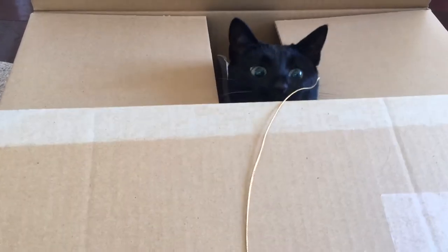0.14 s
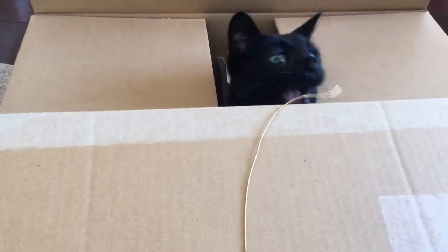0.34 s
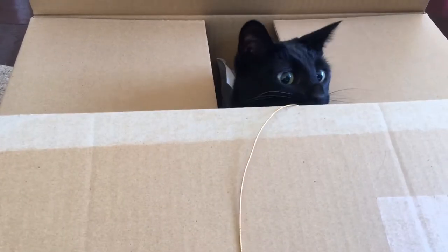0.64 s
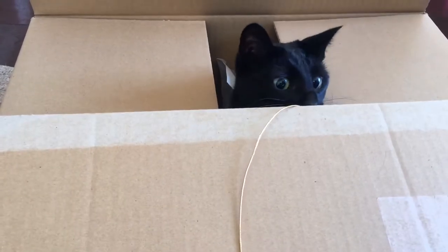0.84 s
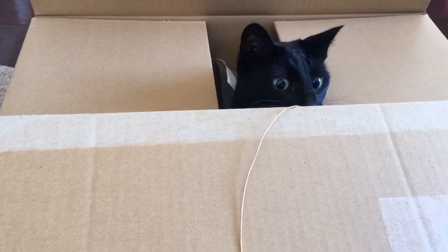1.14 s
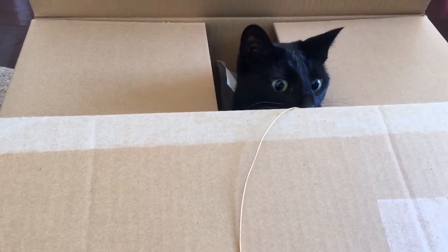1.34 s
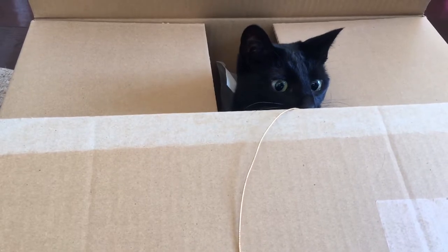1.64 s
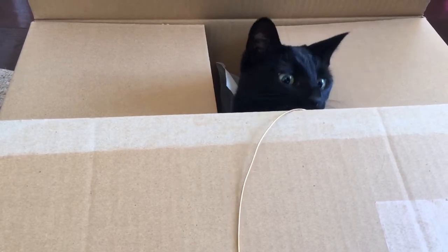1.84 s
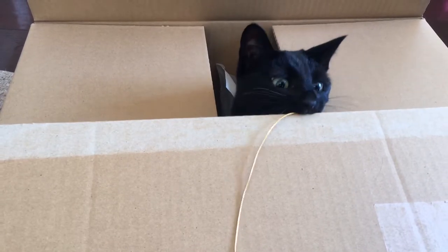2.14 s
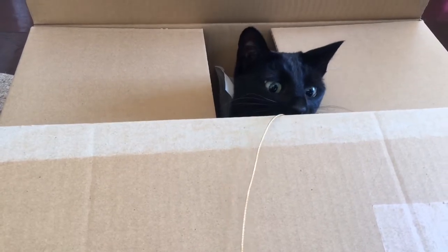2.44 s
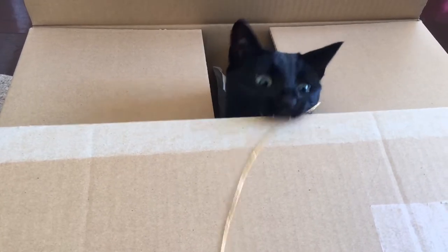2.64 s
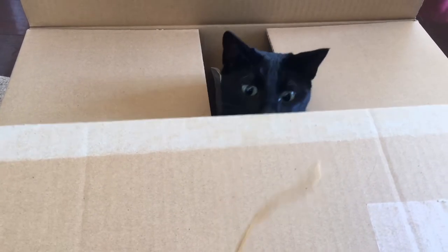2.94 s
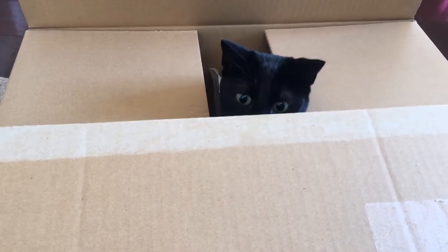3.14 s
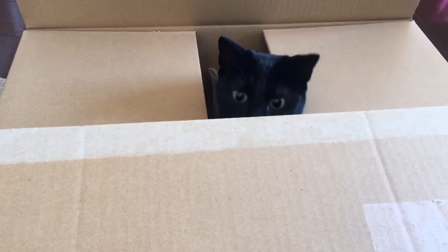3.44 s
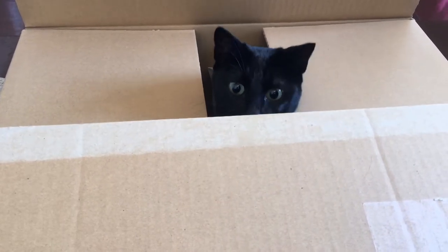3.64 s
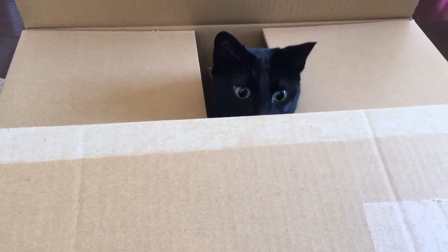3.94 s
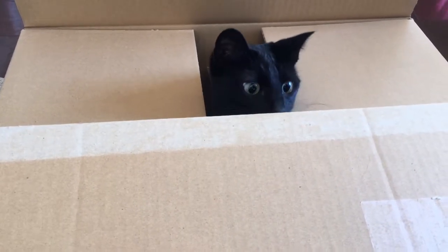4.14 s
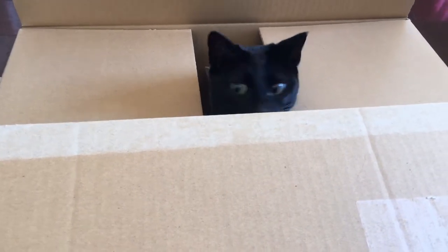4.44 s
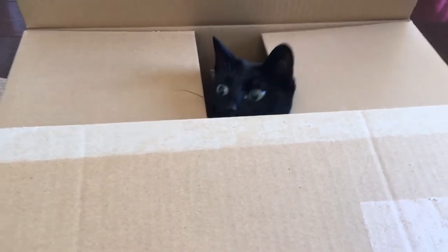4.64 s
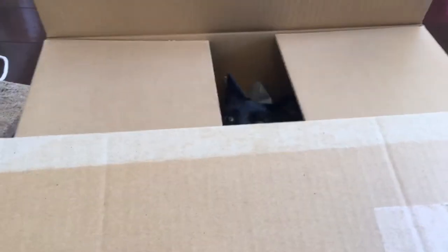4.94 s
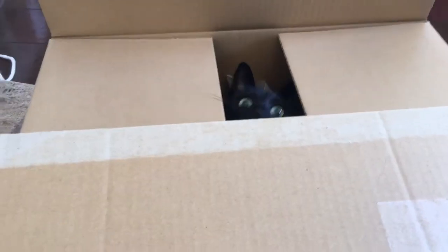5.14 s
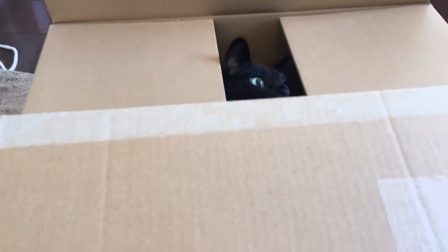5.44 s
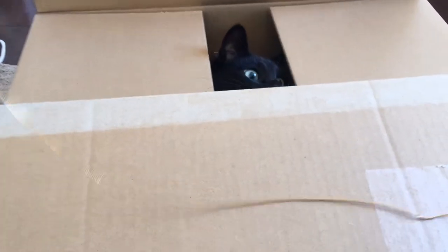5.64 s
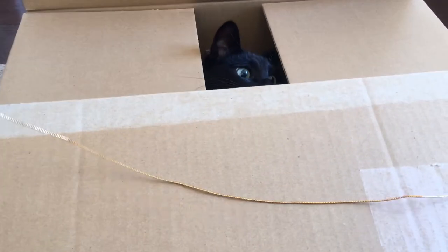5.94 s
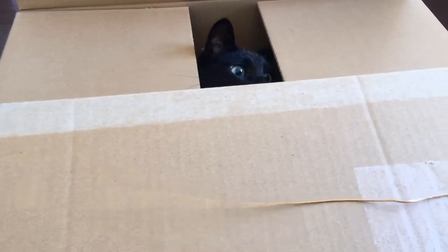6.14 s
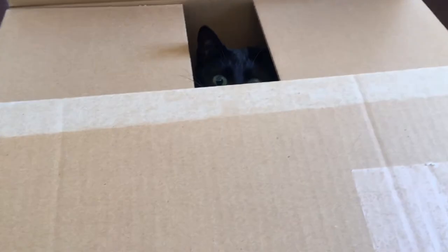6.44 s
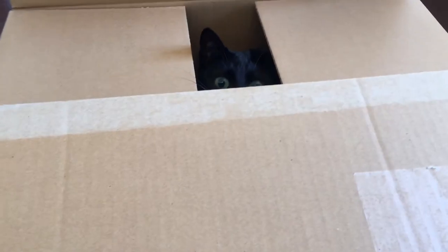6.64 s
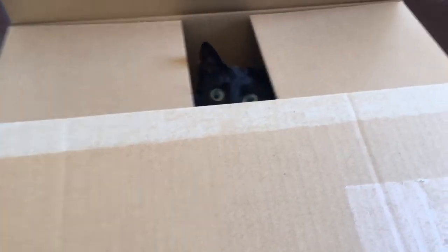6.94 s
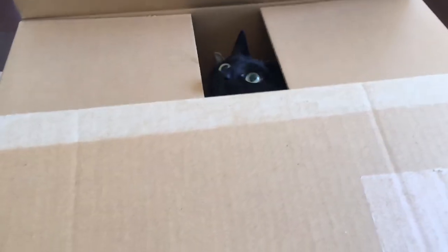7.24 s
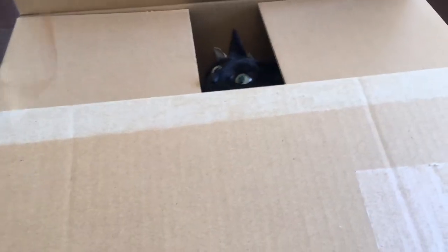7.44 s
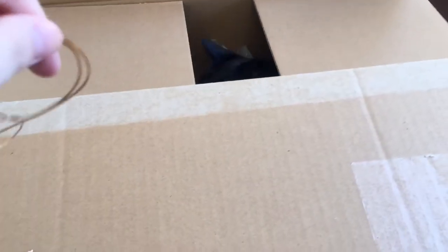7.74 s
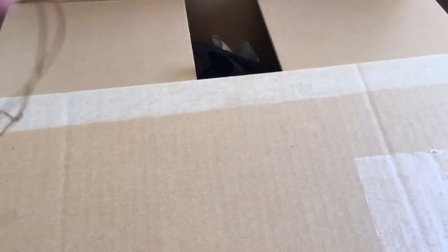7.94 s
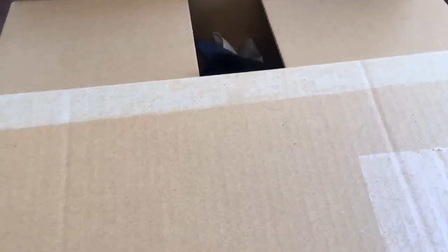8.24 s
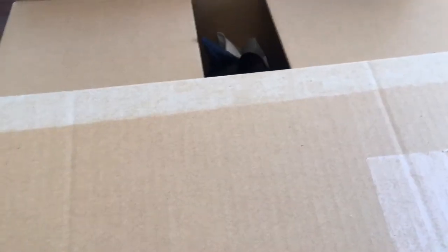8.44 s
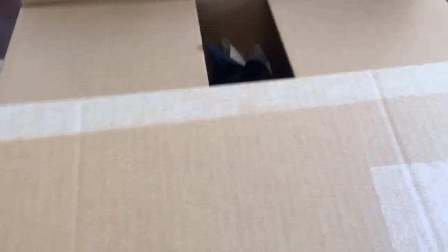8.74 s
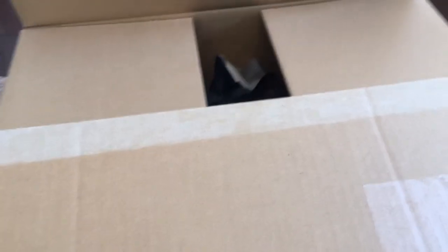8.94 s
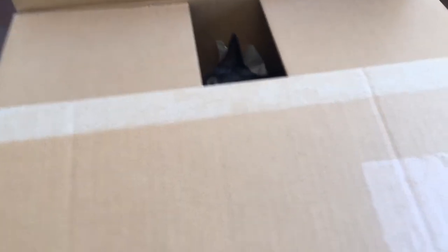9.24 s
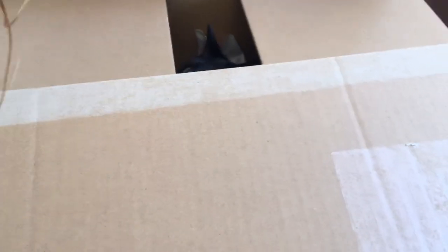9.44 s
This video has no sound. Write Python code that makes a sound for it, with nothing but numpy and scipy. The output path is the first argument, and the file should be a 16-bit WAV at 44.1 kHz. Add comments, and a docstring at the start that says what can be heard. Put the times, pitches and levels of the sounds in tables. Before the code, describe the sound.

Dry cardboard crackling and light claw taps cluster early, over low room rumble and faint hiss. Fur and paws rub the board, and a thin string drags with fine airy hiss. One heavy, dull body bump makes the box boom. Then come isolated snaps, quieter rustles, a bright rasping tug of string, and closing ticks, all heard close with short indoor reflections.

```python
"""A soft thud and a rub on board open the scene: a cat shifts in a cardboard box in a quiet room.
Fibres snap and claws tick as short noise bursts; fur and paws scrape as clumped random slips.
A string dragged over the lid hisses as dense fine slips and is tugged over the edge; bumps make
the box boom. Contacts ring the modes of walls and lid, close to a small microphone."""
import sys
import numpy as np
from scipy import signal
from scipy.fft import rfft, irfft
from scipy.io import wavfile
from scipy.ndimage import uniform_filter1d

SR = 44100
rng = np.random.default_rng(int(sys.argv[2]) if len(sys.argv) > 2 else 0)


def nominal_scale(level):
    """Amplitude ratio for a level in decibels (scalar or array-like)."""
    x = np.asarray(level, float) / 20
    return 10 ** x


def to_wav(sig):
    """Store sig (one row per channel, or 1-D mono) as 16-bit WAV at the path in sys.argv[1].

    Samples outside -1..1 are clipped; the rate is SR.
    """
    pcm = np.clip(np.atleast_2d(sig), -1, 1) * 32767
    pcm = np.round(pcm).astype(np.int16)
    wavfile.write(sys.argv[1], SR, pcm.T)  # frames by channels


N = 422478  # length in samples

# Fibre snaps and claw ticks. Each row: start in seconds, peak of the flap sound in dB,
# ring of the flap in Hz, peak of the treble crack in dB against the flap, length of the tear in ms.
SNAPS = [(0.05, -42, 1280, -7, 4.4), (0.261, -51.5, 2340, -20, 24), (0.372, -46, 875, -4, 4.2),
         (0.386, -42, 1500, -13, 6), (0.4, -37, 2280, -4.5, 12), (0.425, -37, 2560, -14, 8.5),
         (0.44, -36, 2650, -6, 6.8), (0.446, -30, 1510, -19, 1.2), (0.451, -33, 2020, -4, 5.1),
         (0.492, -39, 3920, -20, 5.5), (0.534, -34.5, 1850, -26, 2), (0.602, -37, 2340, -28, 6),
         (0.671, -36, 1320, -1.5, 6.8), (0.701, -49, 1990, -17, 4.6), (0.749, -45, 1840, -19, 24),
         (0.775, -46, 2300, -20, 6.1), (0.866, -41.5, 1010, -3, 8.4), (0.875, -40, 970, -5, 8.7),
         (0.907, -39.5, 2350, -13, 5), (0.936, -48, 1780, -12, 5), (0.975, -43.5, 940, -21, 5.3),
         (1.015, -44, 1540, 8, 9.7), (1.097, -39, 3360, 5, 7.1), (1.159, -47, 2150, -12, 4.1),
         (1.189, -38, 2030, -8, 5.3), (1.217, -45, 2200, -12, 4), (1.264, -50.5, 2160, -2, 8.6),
         (1.319, -46.5, 990, -10, 4.7), (1.457, -25.5, 3690, -25, 2), (1.486, -39, 1063, 5, 8.6),
         (1.661, -47, 1040, -5, 4.2), (1.873, -44.5, 1010, -15, 9.3), (2.078, -50.5, 990, -20, 7.2),
         (2.148, -53, 1160, 9.5, 2.4), (2.223, -46.5, 1630, -13, 2.6), (2.241, -49.5, 1110, 4.5, 22),
         (2.333, -45, 1800, -2, 5), (2.356, -40, 1120, -9.5, 11), (2.414, -38, 2640, -1.5, 4.7),
         (2.533, -47, 2440, 1, 14), (2.594, -42, 920, 7.5, 4.9), (2.655, -35.5, 700, -18, 1.9),
         (2.669, -28.5, 755, 0.5, 9.9), (2.74, -41, 850, -6, 13), (3.046, -39.5, 2630, -25, 10.4),
         (3.064, -41, 930, -8, 6.8), (3.526, -46.5, 1650, -19, 8), (3.544, -44, 1920, -27, 6),
         (3.612, -48.5, 2100, -25, 5.4), (3.915, -52.5, 760, -17, 14), (3.948, -51.5, 1070, -4, 17),
         (3.978, -43, 1137, -11, 6.9), (4.187, -52, 1090, -8, 6.7), (4.286, -42.5, 1095, -30, 6.5),
         (4.507, -41.5, 860, -4, 11.3), (4.565, -40, 1410, -16, 8.2), (4.628, -46.5, 1930, 1, 7.9),
         (4.677, -32, 3206, -4, 9.3), (4.817, -33, 2330, -7, 12.7), (4.884, -44, 990, 4.5, 7.9),
         (4.954, -40, 1730, -10, 6.3), (4.998, -44.5, 1500, 3.5, 6), (5.073, -48.5, 990, -26, 15.6),
         (5.148, -50.5, 1060, -4, 7.6), (5.364, -50.5, 1180, -20, 6.1), (5.404, -48, 820, -5, 11),
         (5.485, -27, 1985, -0.5, 9), (5.511, -46, 1220, 9, 6.8), (5.78, -55.5, 1540, -1, 11),
         (5.895, -46, 1114, -33, 8.3), (5.991, -49.5, 3450, -34, 2.1), (6.242, -45, 1440, -28, 19),
         (6.381, -46, 1354, 3, 7.4), (6.447, -53, 1100, -6, 8.5), (6.955, -45.5, 1105, -9, 9.5),
         (7.115, -34.5, 2180, -3, 12), (7.144, -42, 910, -10, 13), (7.236, -47, 1400, -14, 12.6),
         (7.394, -49, 1164, -27, 2.4), (7.49, -40.5, 1430, -1.5, 3), (7.51, -52, 1960, 11, 15),
         (7.542, -50, 1040, 11, 14), (7.623, -42, 1100, 0, 4), (7.641, -39.5, 2240, -8, 8),
         (7.649, -46, 720, 6, 4.3), (8.066, -53.5, 910, -21, 9.5), (8.253, -45.5, 3250, 6, 5.3),
         (8.365, -39, 1380, -17, 7.2), (8.461, -56, 900, -9, 5.6), (8.937, -47.5, 1090, -32, 6.2),
         (9.246, -38.5, 1050, -4.5, 8.5), (9.286, -45, 4170, 2, 3.4), (9.396, -41, 1450, 3.5, 5.9),
         (9.418, -49, 2420, -8, 2), (9.425, -43.5, 1530, 0, 5.9), (9.492, -43, 2400, -6, 2.7),
         (9.546, -46.5, 820, -20, 3), (9.564, -47.5, 610, -22, 2.5), (9.497, -35.5, 1270, -21, 5.7)]
# Modes of the box walls, before damping. Each row: pitch in Hz, level in dB, time to fall 60 dB in s.
WALLS = [(48, -3, .12), (83, -19, .22), (97, -15, .35), (119, 4, .13), (184, 2, .12), (270, -4, .16),
         (340, -5, .11), (552, -12, .1), (630, -1, .07), (815, -15, .07), (1105, -16, .07)]
# Modes of the taped lid, before damping. Each row: pitch in Hz, level in dB, time to fall 60 dB in s.
LID = [(260, 0, .35), (600, -5, .2), (1130, -12, .11), (1880, -14, .1)]
# Moves of the cat, each rubbing the board and loading the walls.
# Each row: start in seconds, hold in seconds, rubbing in dB, weight in dB.
MOVES = [(0., 0.0042, -53, -62), (0.371, 0.17, -52.5, -68.5), (0.68, 0.56, -59.5, -70),
         (1.352, 0.8, -67, -72.5), (2.243, 0.27, -67, -68), (2.595, 0.044, -53, -70),
         (2.694, 0.045, -63, -56), (2.758, 0.42, -73.5, -86), (3.47, 0.16, -69, -74),
         (4.443, 0.45, -68.5, -71), (4.821, 0.15, -53.5, -61), (5.158, 0.31, -72.5, -80),
         (5.53, 0.093, -64, -74), (5.82, 0.61, -82, -72.5), (6.912, 0.073, -65, -62.5),
         (7.215, 0.15, -73, -71), (7.532, 0.059, -78, -62.5), (7.637, 0.011, -58, -80),
         (7.79, 0.07, -71, -69), (8.157, 0.019, -66, -82), (8.242, 0.0087, -61, -66.5),
         (8.73, 0.018, -78, -66), (9.104, 0.014, -67.5, -69), (9.296, 0.017, -60, -75),
         (9.424, 0.14, -62.5, -60.5)]


def evened(x):
    """Scales to rms 1."""
    return x / np.sqrt(np.mean(x ** 2) + 1e-20)


def read(points, hz):
    """Reads a table on a log-frequency axis."""
    f, value = np.transpose(points)
    return np.interp(np.log(hz + 1), np.log(f + 1), value)


def add(mix, s, sound):
    """Mixes a sound in at time s."""
    part = mix[max(round(s * SR), 0):][:len(sound)]
    part += sound[:len(part)]


def lowered(x, size):
    """Slows a random signal by averaging over size samples, at rms 1."""
    return evened(uniform_filter1d(x, size=size))


def coloured(x, spectrum, patchy_db):
    """Gives x a spectrum that drifts in random patches of time and pitch."""
    hz, t, z = signal.stft(x, SR, nperseg=256, noverlap=192)
    patches = rng.standard_normal(z.shape[::-1]).T
    patches = uniform_filter1d(patches, size=10, axis=0)
    patches = evened(uniform_filter1d(patches, size=10, axis=1))
    z = z * nominal_scale(read(spectrum, hz)[:, None] + patchy_db * patches)
    return evened(signal.istft(z, SR, nperseg=256, noverlap=192)[1][:N])


def grains(per_s, spread_db, ms):
    """Random tiny slips, a few of them large, each a noise burst of tearing fibre falling 60 dB in ms."""
    chance, side, moment = rng.random((N, 3)).T
    size = nominal_scale(spread_db * np.minimum(-np.log(chance + 1e-9), 4))
    slips = size * np.sign(side - .5) * (moment < per_s / SR)
    burst = rng.standard_normal(512) * nominal_scale(-60 * np.arange(512) / SR / (ms / 1000))
    return evened(signal.oaconvolve(slips, burst)[:N])


def ring(modes, colour_db=0, detune=1, damping=1):
    """One answer of the board to a blow: decaying sines; colour_db weighs the modes by where it lands."""
    t = np.arange(0, .5 / max(damping, 1), 1 / SR)[:, None]
    hz, db, t60 = np.transpose(modes)
    decay = nominal_scale(db + colour_db - 60 * damping * t / t60)
    waves = decay * np.sin(2 * np.pi * hz * detune * t)
    return waves.sum(axis=1) / nominal_scale(db + colour_db).sum()


def rubbed(force, modes, tilt_db, damping=1):
    """The board under a sliding contact, which damps it; tilt_db per octave favours upper modes."""
    octaves = np.log2(np.transpose(modes)[0] / 250)
    answer = ring(modes, tilt_db * octaves, damping=damping)
    return signal.oaconvolve(force, answer / np.linalg.norm(answer))[:N]


def strokes(start, hold, db, rise_db_per_s, fall_db_per_s, rest_db):
    """Gain over time of strokes that swell, hold and die away; their powers add over a rest level."""
    t = np.arange(0, N / SR + .002, .002)[:, None]
    before = np.maximum(start - t, 0)
    after = np.maximum(t - start - hold, 0)
    shape_db = db - rise_db_per_s * before - fall_db_per_s * after
    power = (nominal_scale(shape_db) ** 2).sum(axis=1) + nominal_scale(rest_db) ** 2
    return np.interp(np.arange(N) / SR, t[:, 0], np.sqrt(power))


def air():
    """Low, lumpy rumble of the house and hiss of the microphone: shaped noise, slightly swelling."""
    # The room at rest. Each row: frequency in Hz, relative density in dB per Hz.
    still = [(20, -50), (50, -3.5), (82, -5), (100, 3), (122, -15), (180, -17), (400, -19), (500, -30),
             (1400, -30.5), (7500, -39.5), (11900, -42.5), (16000, -44)]
    hz = np.fft.rfftfreq(N, 1 / SR)
    noise = irfft(rfft(rng.standard_normal(N)) * nominal_scale(read(still, hz)), N)
    swell = lowered(rng.standard_normal(N), 8000)
    slow = uniform_filter1d(rng.standard_normal(N), size=3000)
    lumps = evened(nominal_scale(3 * lowered(slow, 3000)))  # 3 dB rms
    low = signal.sosfiltfilt(signal.butter(2, 420, fs=SR, output="sos"), noise)
    return nominal_scale(-67.5 + 0.28 * swell) * evened(noise - low + low * lumps)


def room(x):
    """Sparse reflections of random sign, each band dying at its own speed."""
    # Each row: frequency in Hz, time to fall 60 dB in seconds.
    decay = [(200, 0.44), (1000, 0.22), (4000, 0.4), (12000, 0.043)]
    taps = np.zeros(SR // 2)
    at = np.arange(200, len(taps) - 20, 20)
    taps[at + rng.integers(0, 20, len(at))] = rng.choice([-1., 1.], len(at))
    hz, t, z = signal.stft(taps, SR, nperseg=256)
    t60 = np.maximum(read(decay, hz), .02)[:, None]
    tail = signal.istft(z * nominal_scale(-60 * t / t60), SR, nperseg=256)[1]
    return signal.oaconvolve(x, tail / np.linalg.norm(tail))[:N]


def shifting():
    """Uneven weight on the walls, noise with clumped slips, keeps their modes murmuring."""
    push = evened(grains(per_s=300, spread_db=3.5, ms=39.0) + rng.standard_normal(N))
    start, hold, _, weight_db = np.transpose(MOVES)
    weight = strokes(start, hold, weight_db, rise_db_per_s=137, fall_db_per_s=75, rest_db=-79)
    return rubbed(push * weight, WALLS[3:], tilt_db=2.5, damping=7.0)


def rubbing():
    """Strength of the rubbing: the cat's moves, and freed fibres rustling on after each snap."""
    start, hold, rub_db, _ = np.transpose(MOVES)
    moves = strokes(start, hold, rub_db, rise_db_per_s=335, fall_db_per_s=169, rest_db=-80.5)
    s, db, _, _, ms = np.transpose(SNAPS)
    after_db = db - 20 + 7.5 * np.log2(ms / 12.9)  # more after a long tear
    rustle = strokes(s, ms / 1000, after_db, rise_db_per_s=2000, fall_db_per_s=203, rest_db=-120)
    return np.hypot(moves, rustle)


def scrape():
    """Clumped slips of fur and claws on corrugated board, part heard directly, part through the walls."""
    # Direct sound. Each row: frequency in Hz, relative density in dB per Hz.
    spectrum = [(350, -4.5), (470, -59), (600, -3.5), (1100, -3), (1600, -9.5), (2300, -7), (3000, -12.5),
                (5000, -18), (9000, -25.5), (16000, -41)]
    slips = evened(grains(per_s=900, spread_db=6.0, ms=25.6) + .85 * rng.standard_normal(N))
    crackle = grains(per_s=180, spread_db=3.5, ms=10)  # single fibres letting go under the rubbing
    slips = evened(slips + nominal_scale(-3) * crackle)
    direct = coloured(slips, spectrum, patchy_db=3.2)
    force = rubbing()
    through = rubbed(slips * force, WALLS[3:] + LID[2:], tilt_db=9.5, damping=1.6)
    return direct * force + nominal_scale(-15.5) * through


def string_hiss():
    """Very dense fine slips of the string on the paper skin; they keep the lid humming."""
    # Direct sound. Each row: frequency in Hz, relative density in dB per Hz.
    spectrum = [(2500, -10.5), (5000, -14), (6500, -9), (9300, -4.5), (10500, -12), (11800, -4),
                (14000, -13), (16000, -10.5)]
    # Slides of the string. Each row: start in seconds, hold in seconds, level in dB.
    slides = [(0.026, 0.28, -70), (0.413, 0.033, -62), (0.475, 0.13, -63), (0.71, 0.59, -82),
              (1.474, 0.035, -69), (1.647, 0.34, -83), (2.013, 0.07, -65), (2.192, 0.12, -66),
              (2.52, 0.32, -64.5), (2.926, 0.22, -67), (3.444, 0.093, -79), (3.96, 0.18, -79),
              (4.505, 0.53, -67.5), (4.824, 0.13, -59), (5.043, 0.34, -75.5), (5.394, 0.056, -68.5),
              (5.506, 0.067, -57.5), (5.63, 0.038, -70), (6.232, 0.17, -68.5), (6.918, 0.29, -71.5),
              (7.579, 0.056, -56.5), (7.802, .15, -65.5), (8.168, 0.082, -54.5), (8.878, 0.032, -77.5),
              (9.111, 0.01, -67.5), (9.319, 0.2, -60)]
    slips = grains(per_s=1300, spread_db=13.0, ms=24) + 4.5 * rng.standard_normal(N)
    drag = strokes(*np.transpose(slides), rise_db_per_s=283, fall_db_per_s=320, rest_db=-84.5)
    hum = rubbed(rng.standard_normal(N) * drag, LID, tilt_db=4.5, damping=2.4)
    return coloured(slips, spectrum, patchy_db=4.5) * drag + nominal_scale(-6.0) * hum


def tugs():
    """Each tug is a rough hiss round the whistle of the edge, and it shakes the lid."""
    # Quick tugs of the string over the lid edge. Each row: start in seconds, length in seconds,
    # level in dB, whistle of the edge in Hz, depth of chatter from 0 to 1.
    pulls = [(5.59, 0.018, -55.5, 9100, .2), (7.466, 0.014, -58, 10600, .2), (8.134, 0.046, -53, 7800, 0.2),
             (8.14, 0.049, -43.5, 10900, 0.5), (8.179, 0.06, -50.5, 3570, 0.6),
             (8.179, 0.058, -49.5, 8600, 0), (8.195, 0.014, -47, 12100, .4),
             (8.232, 0.02, -39.5, 10600, 0.5), (9.304, 0.048, -58.5, 795, 0.2)]
    hiss, force = np.zeros(N), np.zeros(N)
    slips = evened(grains(per_s=6700, spread_db=4.0, ms=5.6) + rng.standard_normal(N))
    # the string sticks and slips on the edge, about 490 times a second at an uneven pace
    pace = 490 * (1 + 0.59 * lowered(rng.standard_normal(N), 150))
    phase = np.cumsum(pace) / SR % 1
    catch = evened(np.exp(-phase / 0.23))
    for s, length, db, hz, chatter in pulls:
        rough = slips * (1 - chatter + chatter * catch)
        part = rough[round(s * SR):][:round(length * SR)]
        stroke = nominal_scale(db) * signal.windows.tukey(len(part), .6)
        band = [hz / 1.266, min(hz * 1.2, SR / 2.2)]
        edge = signal.butter(3, band, "band", fs=SR, output="sos")
        add(hiss, s, stroke * evened(signal.sosfilt(edge, part)))
        add(force, s, stroke * rng.standard_normal(len(part)))
    return hiss + nominal_scale(-13.5) * rubbed(force, LID[1:], tilt_db=4.5, damping=4.0)


def bumps():
    """A soft blow rings the wall modes nearest to the pitch of the struck place; landings ring the lid."""
    # Blows of the body against the walls. Each row: start in seconds, peak in dB,
    # pitch in Hz that the struck place favours.
    blows = [(0., -39, 77), (2.657, -21.5, 262), (2.670, -15, 185), (2.727, -28.5, 200), (2.831, -47, 95),
             (4.824, -42, 208), (4.847, -47, 130), (6.874, -50, 61.6), (6.946, -44, 49.7),
             (7.145, -55, 102)]
    # The string or a paw landing on the lid. Each row: start in seconds, level in dB,
    # hardness in dB per octave, damping by what rests on it (a factor on the decay speed).
    landings = [(0.749, -43.5, -7, 4.7), (2.244, -44, 1.5, 0.59), (2.783, -36.5, -8, 1.4),
                (5.491, -37.5, 1, 2.5), (7.49, -31, 6, 3.3), (7.513, -42, 6, 4.6), (8.255, -47, 5, 2.5)]
    out = np.zeros(N)
    soft = 1 - np.exp(-np.arange(SR // 2) / SR / 0.0038)  # onset over 3.8 ms
    for s, db, hz in blows:
        octaves = np.log2(np.transpose(WALLS)[0] / hz)
        # deep or faint blows are soft and wake few modes
        focus_db = (200 / hz) ** 2.6 + nominal_scale(-2.2 * db - 54)
        boom = soft * ring(WALLS, -focus_db * octaves ** 2)
        add(out, s, nominal_scale(db) * boom / abs(boom).max())
    octaves = np.log2(np.transpose(LID)[0] / LID[0][0])
    for s, db, hardness_db, damping in landings:
        add(out, s, nominal_scale(db) * ring(LID, hardness_db * octaves, damping=damping))
    return out


def snaps():
    """Each snap is a few ms of breaking fibres through a flap resonance, a bright crack and a knock."""
    out, t = np.zeros(N), np.arange(4096) / SR
    draws = rng.standard_normal((len(SNAPS), 2, 4096))
    places = rng.standard_normal((len(SNAPS), 2, len(WALLS)))
    octaves = np.log2(np.transpose(WALLS)[0] / 250)
    bright = signal.butter(2, [3100, 12000], "band", fs=SR, output="sos")
    rise = 1 - np.exp(-t / 0.00021)
    rattle = 0.19 * rise * nominal_scale(-60 * t / 0.055)
    first = np.arange(4096) == 40
    for (s, db, hz, treble_db, ms), (a, b), (weight, tune) in zip(SNAPS, draws, places):
        a, b = a + 4.2 * first, b + 4.5 * first  # the first fibre breaks hardest
        burst = rise * np.exp(-(t * 1000 / ms) ** 2)  # the tear runs, then stops
        band = [max(hz / 2.4, 560), hz * 2.24]
        resonance = signal.butter(2, band, "band", fs=SR, output="sos")
        flap = signal.sosfilt(resonance, a * (burst + rattle))
        # loose bits of flap ring briefly
        tones = hz * 2 ** (0.4 * np.append(tune[:2], 0))[:, None]
        bits = rise * nominal_scale(-60 * t / .032) * np.sin(2 * np.pi * tones * t).sum(axis=0)
        flap = flap / abs(flap).max() + .3 * bits
        crack = signal.sosfilt(bright, b * (burst ** 4.1 + rattle))
        crack = nominal_scale(treble_db) * crack / abs(crack).max()
        add(out, s, nominal_scale(db) * (flap / abs(flap).max() + crack))
        # every tap lands elsewhere on the walls
        knock = ring(WALLS, 5 * octaves + 4 * weight, 1 + .03 * tune, damping=1.5)
        add(out, s, nominal_scale(db - 13.5) * 1200 / hz * knock)  # dull snaps come from heavier contacts
    return out


def scene():
    """The box with its echoes over the still room."""
    hits = snaps() + bumps() + tugs()
    # the box radiates weakly in a band 120 Hz wide round 430 Hz
    hits = signal.lfilter(*signal.iirnotch(430, 430 / 120, SR), hits)
    box = hits + nominal_scale(-17.5) * room(hits) + scrape() + string_hiss() + shifting()
    # the small microphone passes no deep bass
    near = signal.sosfilt(signal.butter(2, 35, "high", fs=SR, output="sos"), box)
    return (near + air())[None]


def top_cut(x):
    """Nothing passes above the cut-off."""
    return signal.sosfilt(signal.butter(12, 16460, fs=SR, output="sos"), x)


def record(dry):
    """The top of the finished mix is cut at 15.9 kHz by a low-pass."""
    low_pass = signal.firwin(255, 15900, window=("kaiser", 3.), fs=SR)
    mix = signal.oaconvolve(dry, low_pass[None], "same")
    return top_cut(mix)


dry = scene()
out = record(dry)
to_wav(out)
```